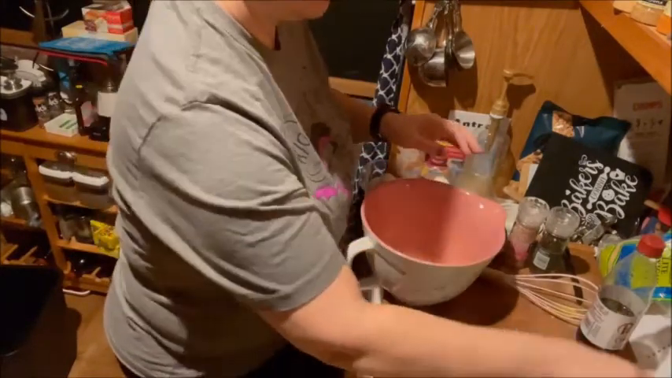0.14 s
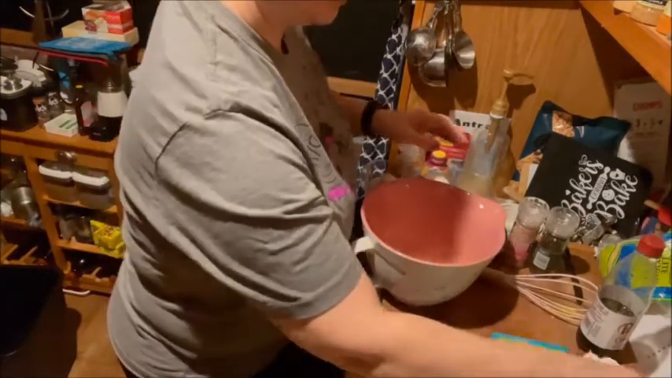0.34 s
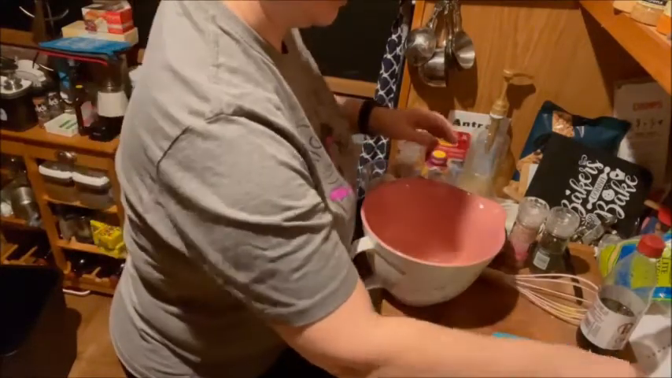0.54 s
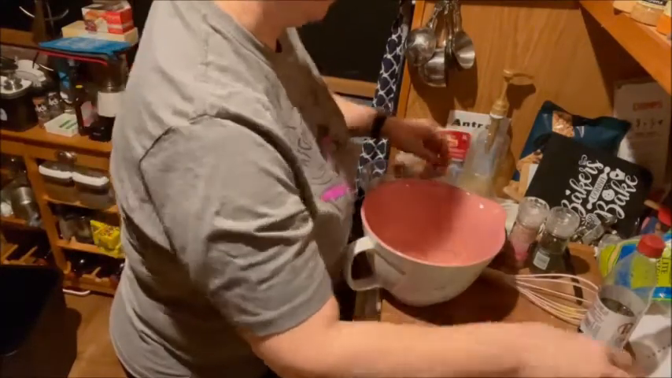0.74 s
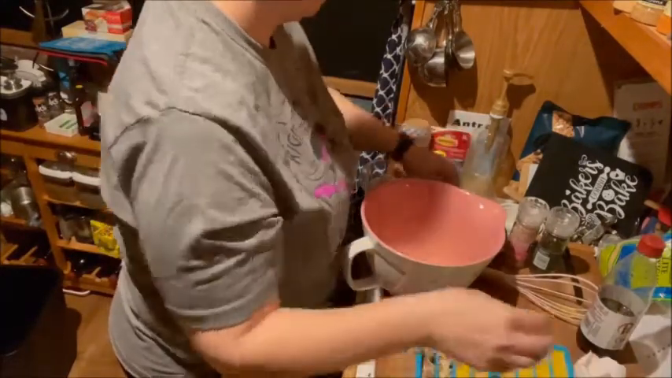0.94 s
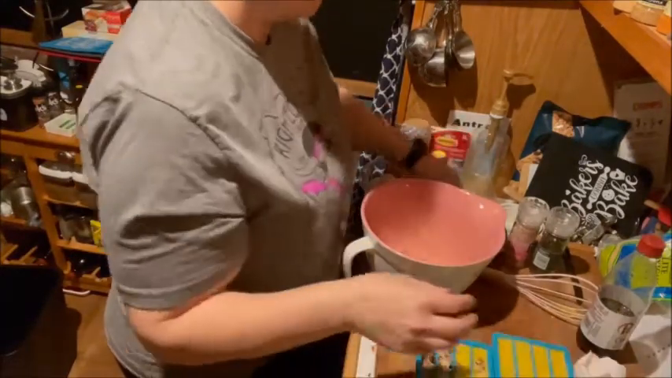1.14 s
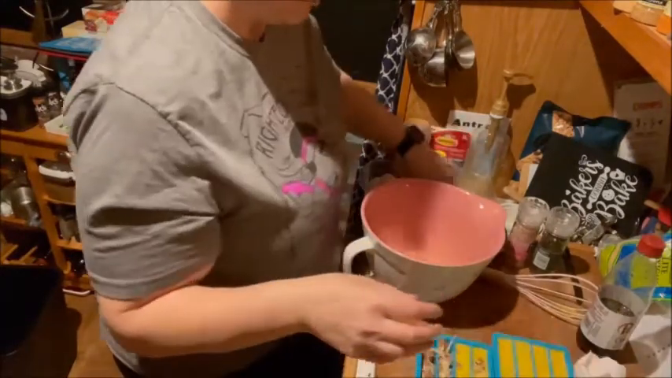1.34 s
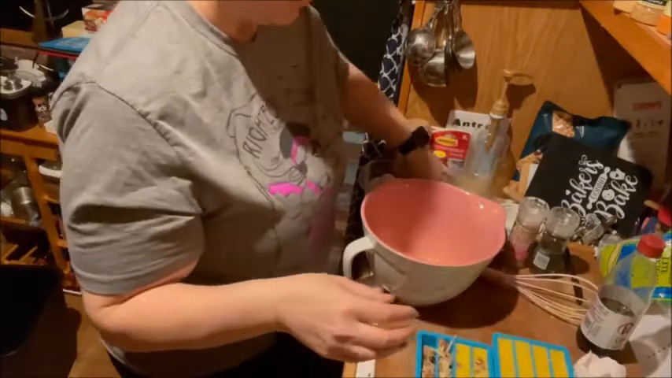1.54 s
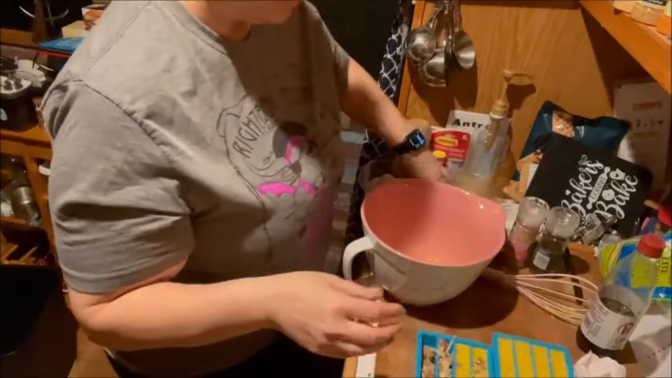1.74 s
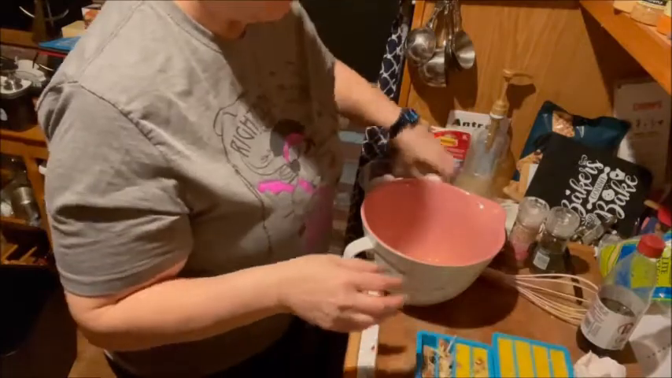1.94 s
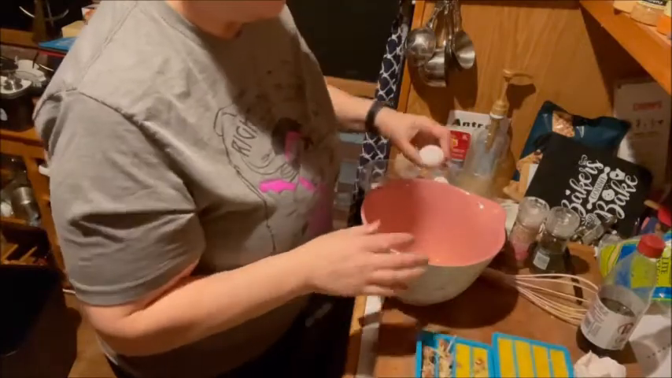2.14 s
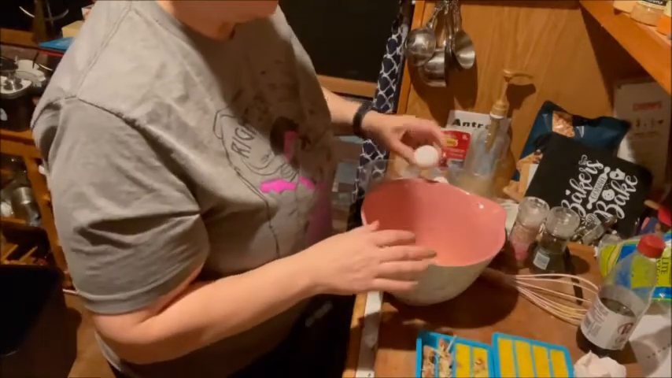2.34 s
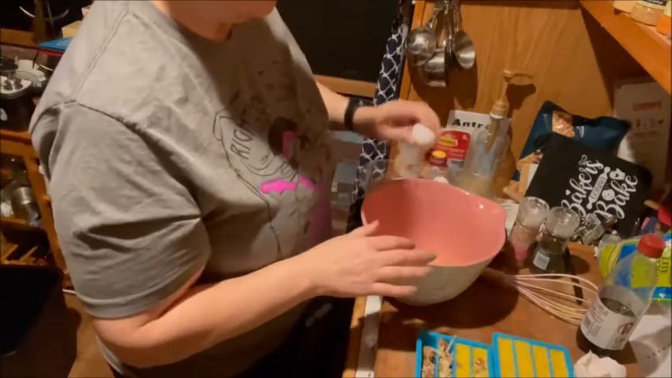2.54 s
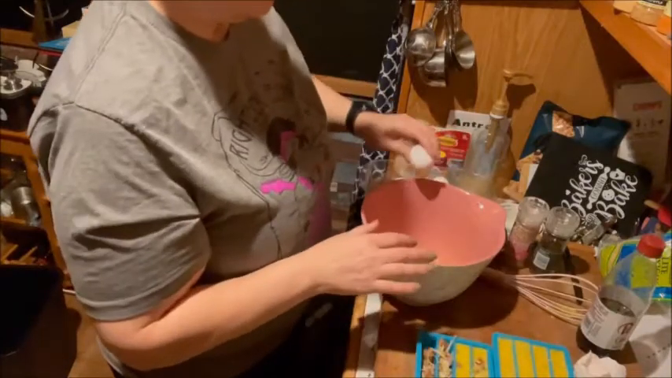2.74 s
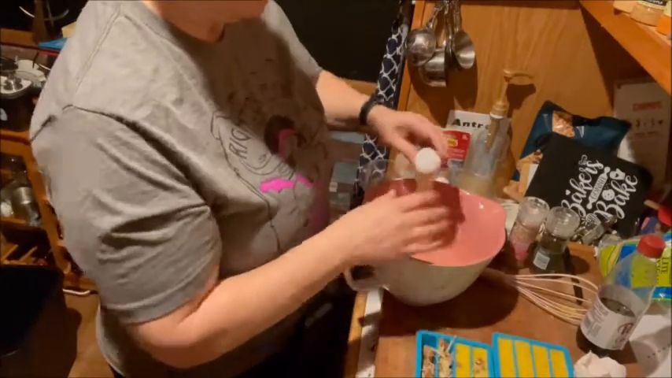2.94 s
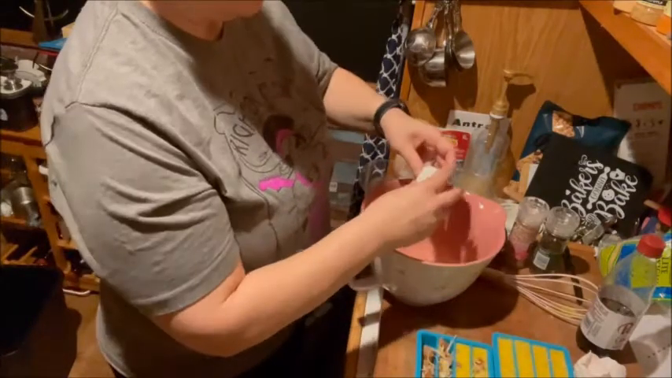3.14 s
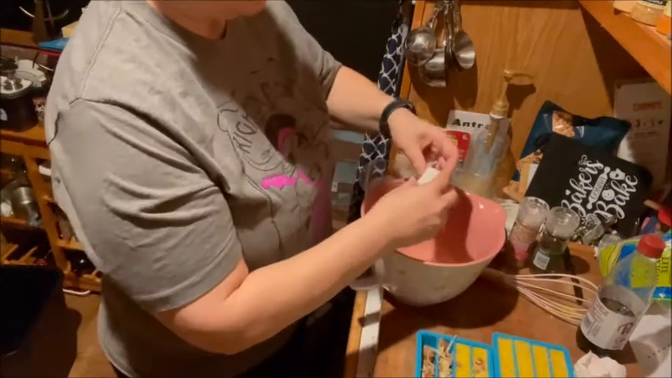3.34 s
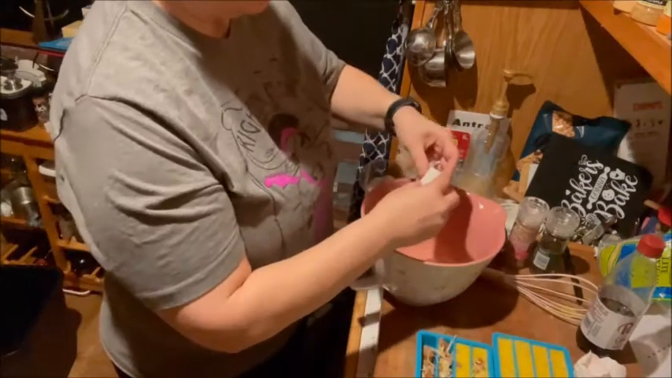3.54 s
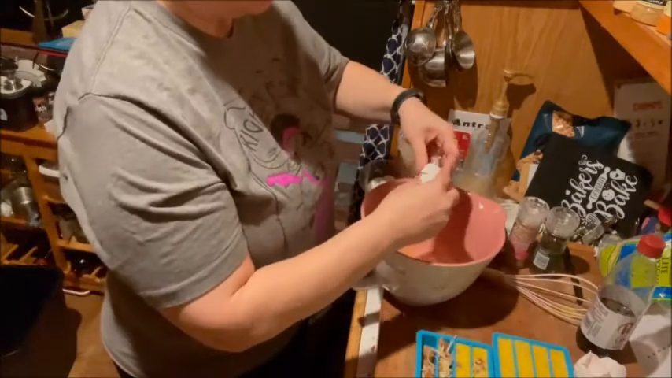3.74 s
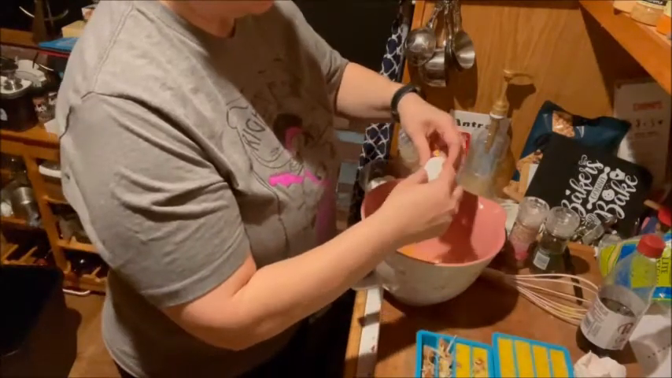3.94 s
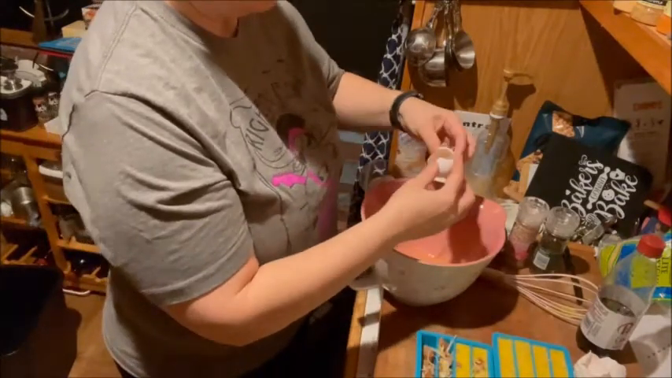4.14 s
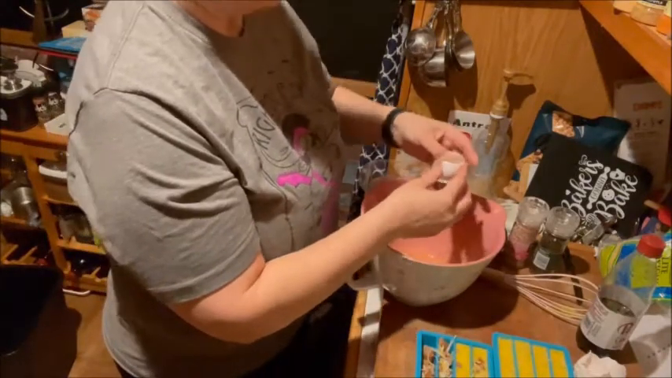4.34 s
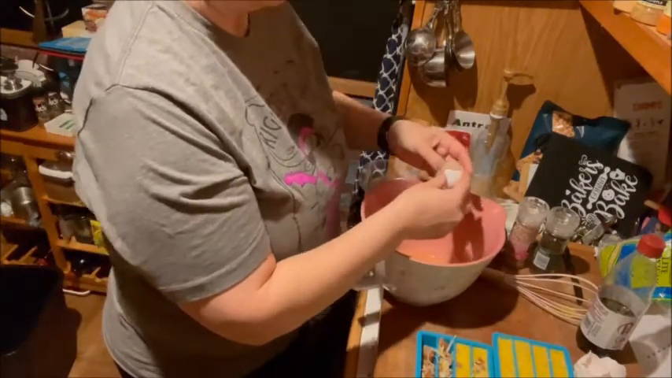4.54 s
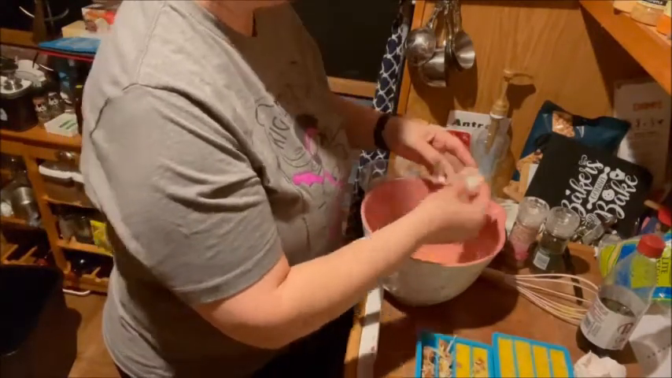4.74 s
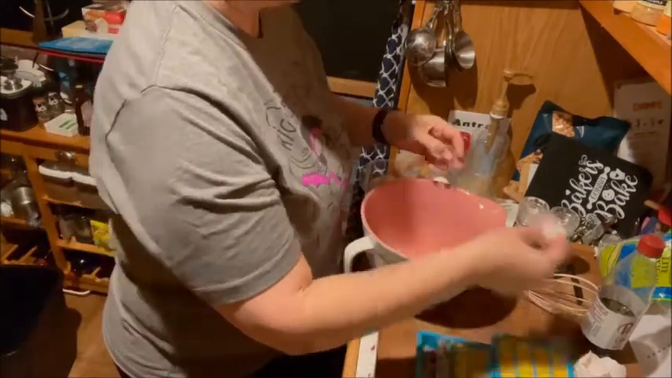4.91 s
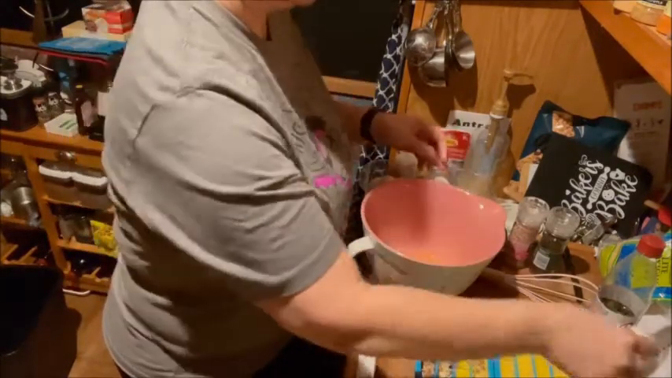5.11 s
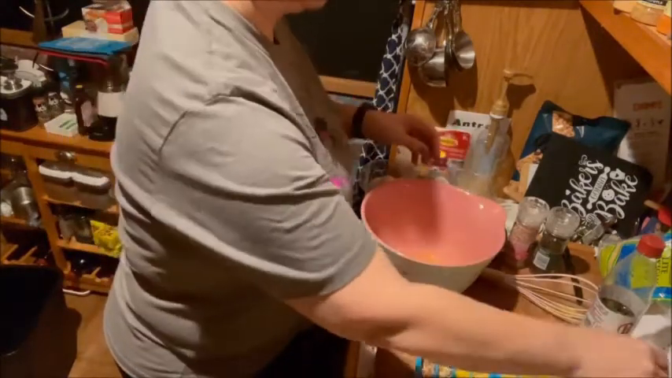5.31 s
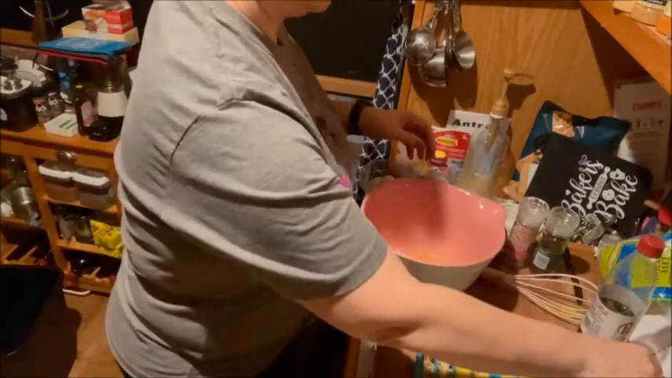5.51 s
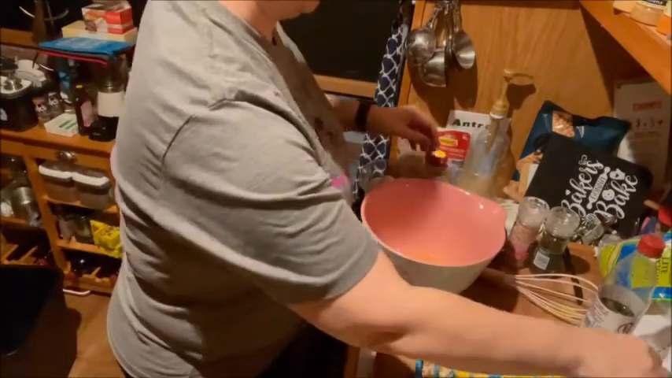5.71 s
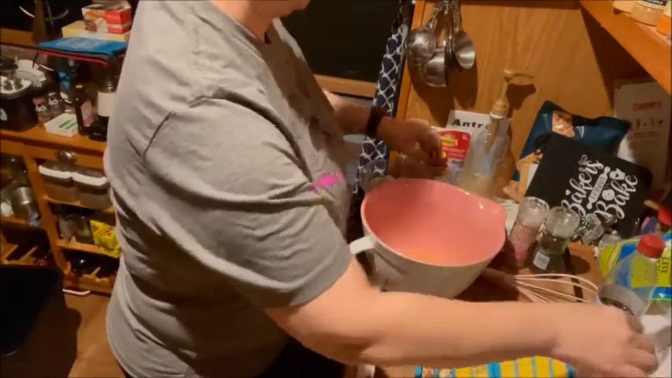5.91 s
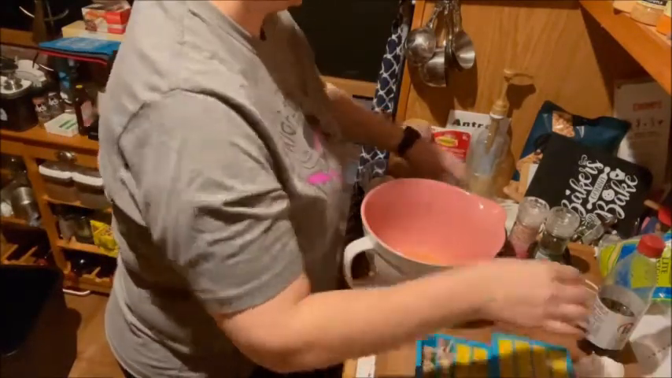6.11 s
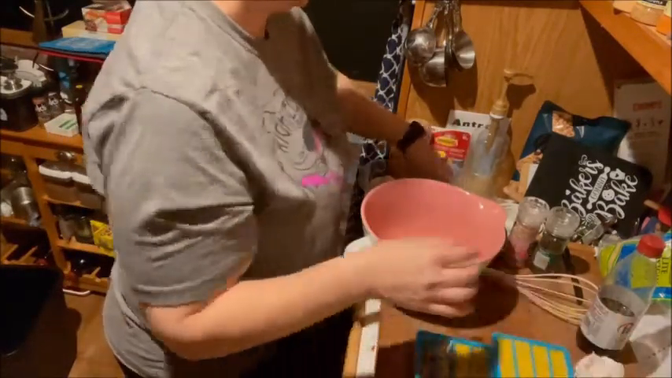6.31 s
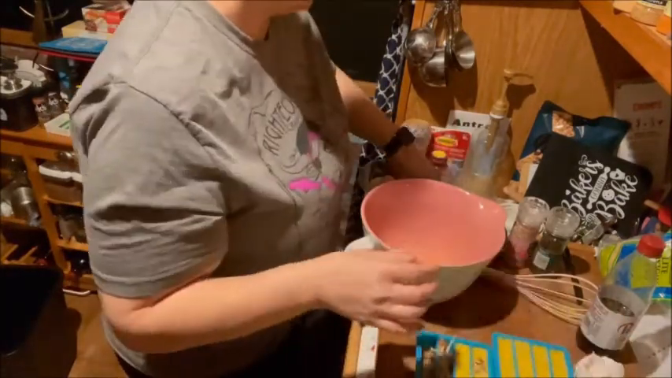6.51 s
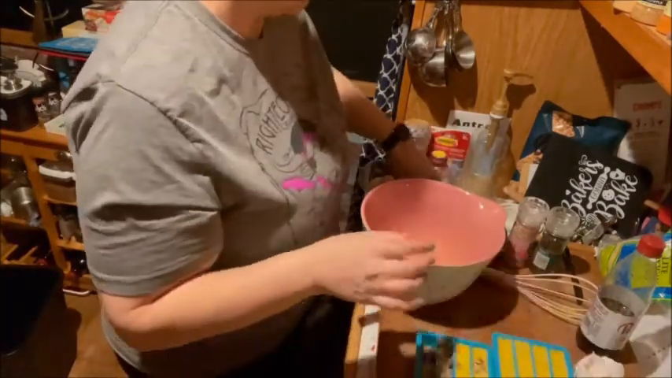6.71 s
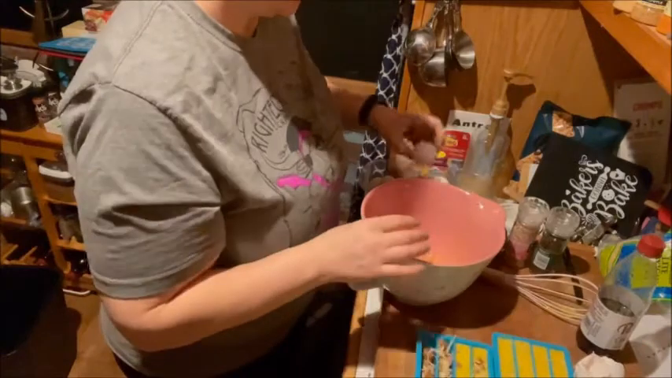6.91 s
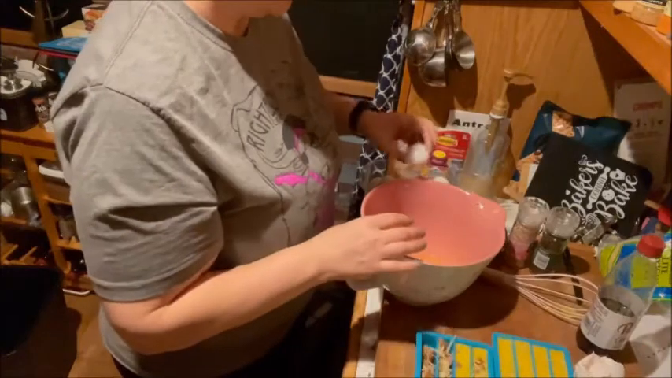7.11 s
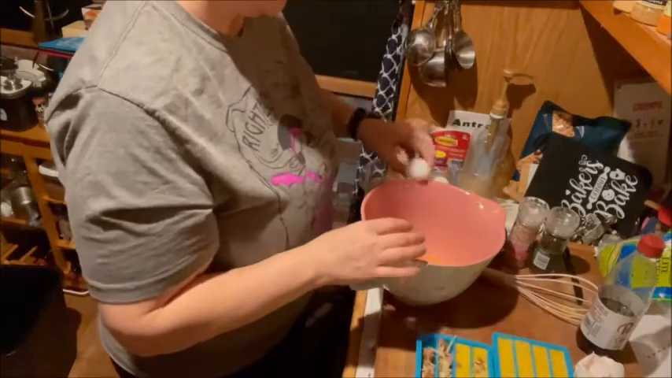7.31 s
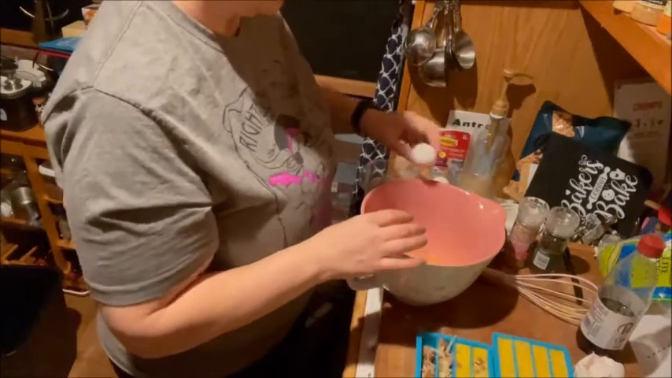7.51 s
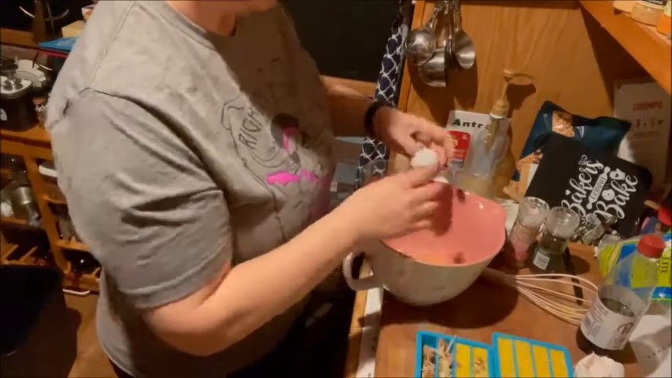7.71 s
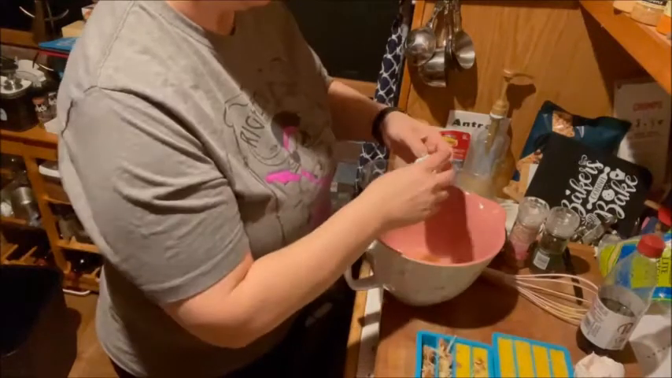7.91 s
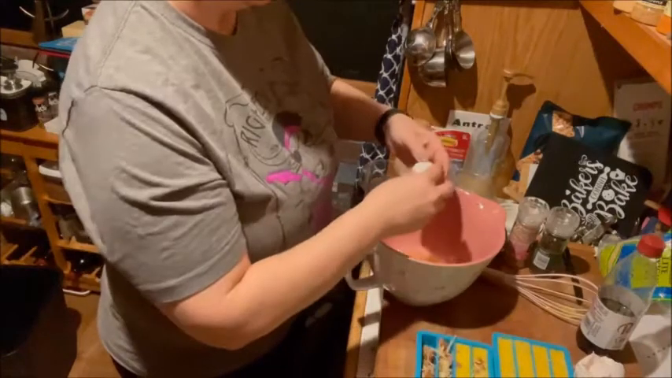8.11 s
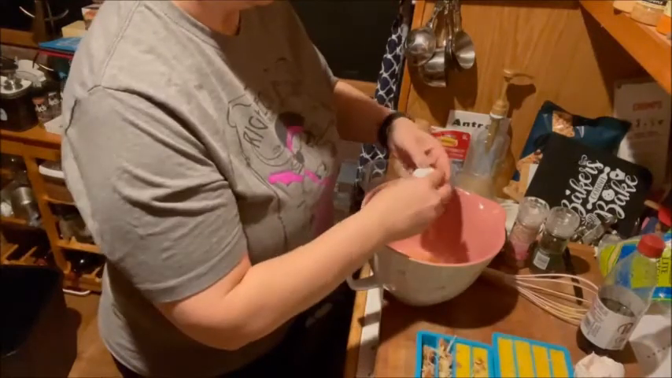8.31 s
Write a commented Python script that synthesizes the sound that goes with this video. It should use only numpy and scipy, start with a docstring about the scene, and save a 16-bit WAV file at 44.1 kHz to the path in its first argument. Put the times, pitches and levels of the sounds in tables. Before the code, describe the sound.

Empty eggshells scrape and clack lightly into a carton over low kitchen noise. An egg knocks about in its box, then is cracked sharply on a mixing bowl, whose rim rings briefly. The shell snaps and tears, and the egg drops in with a faint plop. More shells go into the carton, and a second egg is cracked and pried with a faint wet creak. Soft counter thuds come in between, all heard through the small room.

```python
"""Empty eggshells scrape and clack into a carton over the low noise of a small kitchen.
Counter and floor thud softly as the cook leans over. Two eggs in turn knock about in their box and are
cracked on the ringing rim of a mixing bowl. The first snaps, tears and drops in; the second creaks
wetly and snaps as it is pried. Blows are clicks with a run of tiny fractures, friction is a stream
of catches and slips, both heard through the room; the bowl is a sum of decaying modes."""
import sys
import numpy as np
from scipy import signal
from scipy.fft import rfft, irfft
from scipy.io import wavfile

SR = 44100
rng = np.random.default_rng(int(sys.argv[2]) if len(sys.argv) > 2 else 0)


def dump(signal):
    """Clip the signal to [-1, 1] and save it as 16-bit WAV at the path in sys.argv[1]."""
    limited = np.clip(np.atleast_2d(signal).T, -1, 1)
    pcm = np.round(limited * 32767).astype(np.int16)
    wavfile.write(sys.argv[1], SR, pcm)


N = 368676


def amp(db):
    """Decibels to gain."""
    return 10 ** (np.asarray(db) / 20)


def unit(x):
    """Scales to rms 1."""
    return x / np.sqrt(np.mean(x ** 2) + 1e-20)


def read(points, hz):
    """Interpolates a table over log frequency."""
    f, value = np.transpose(points)
    return np.interp(np.log(hz + 1), np.log(f + 1), value)


def add(mix, start_s, sound):
    """Mixes a sound in at start_s."""
    part = mix[:, max(round(start_s * SR), 0):][:, :sound.shape[1]]
    part += sound[:, :part.shape[1]]


def pulse(colour, tilt_db_oct=0, size=4096):
    """Minimum-phase click of a given colour, energy 1."""
    hz = abs(np.fft.fftfreq(size, 1 / SR))
    log_gain = np.log(amp(np.maximum(read(colour, hz), -100) + tilt_db_oct * np.log2(hz + 20)))
    spectrum = np.exp(np.conj(signal.hilbert(log_gain)))
    click = np.fft.ifft(spectrum).real[:size // 2]
    return click / np.linalg.norm(click)


# left-right correlation: f/Hz, coefficient
CORRELATION = [(50, 0.5), (250, 0.6), (500, 0.1), (1000, -.15), (2400, 0), (6000, -.1), (16000, -.2)]

def pair(x):
    """Makes two unrelated channels alike at long wavelengths."""
    left, other = rfft(x)
    same = np.clip(read(CORRELATION, np.fft.rfftfreq(x.shape[1], 1 / SR)), -1, 1)
    right = same * left + np.sqrt(1 - same ** 2) * other
    return irfft(np.array([left, right]), x.shape[1])


def noise(colour):
    """Steady coloured stereo noise, rms 1."""
    spectrum = rfft(rng.standard_normal((2, N))) * amp(read(colour, np.fft.rfftfreq(N, 1 / SR)))
    return unit(pair(irfft(spectrum, N)))


# kitchen reverberation: f/Hz, t60/s
KITCHEN_T60 = [(60, 0.077), (250, 0.37), (600, .28), (1500, 0.34), (4000, .31), (8000, .25), (16000, .18)]

def kitchen(direct_db, early_db=-1, early_s=0.012, echoes_per_s=1500, size=12288):
    """Path from one spot: direct sound, quick echoes off counter and cupboards, short tail."""
    t = np.arange(size) / SR
    hz, frame_s, diffuse = signal.stft(pair(rng.standard_normal((2, size))), SR, nperseg=256)
    decay = amp(-60 * frame_s / read(KITCHEN_T60, hz)[:, None])
    tail = signal.istft(diffuse * decay, SR)[1][:, :size]
    echoes = rng.choice([-1, 1], (2, size)) * (rng.random((2, size)) < echoes_per_s / SR)
    early = pair(echoes) * np.exp(-t / early_s)
    path = (unit(tail) + amp(early_db) * unit(early)) / np.sqrt(size)
    path[:, 0] += amp(direct_db)
    return path / np.sqrt(np.sum(path ** 2) / 2)


def envelope(length_s, attack_s, release_s, sag_db):
    """One gesture: swell, sag, release."""
    t = np.arange(0, length_s + 6 * release_s, 1 / SR)
    held = np.minimum(t / attack_s, 1) * amp(sag_db * np.minimum(t / length_s, 1))
    return held * np.exp(-np.maximum(t - length_s, 0) / release_s)


def strokes(rows, colour, gain_db, attack_s, release_s, sag_db, catches_per_s, spread_db):
    """Friction: dense runs of small catches and slips, heard through the room."""
    path = signal.fftconvolve(pulse(colour)[None], kitchen(direct_db=-5), axes=1)
    out = np.zeros((2, N))
    for start_s, length_s, db in rows:
        contact = amp(db + gain_db) * envelope(length_s, attack_s, release_s, sag_db)[:SR]
        sign, size, chance = rng.random((3, SR))[:, :len(contact)]
        size_db = spread_db * np.minimum(-np.log(size + 1e-9), 4)
        slips = np.sign(sign - .5) * amp(size_db) * (chance < catches_per_s / SR)
        add(out, start_s, signal.fftconvolve((unit(slips) * contact)[None], path, axes=1))
    return out


def force(crush_s, crumble_db, lead_s, lead_db, grains_per_s=2200, size=5000):
    """A scuff swelling into contact, one click, then a dying run of tiny fractures."""
    t = np.arange(size) / SR - lead_s
    grains = rng.standard_normal(size) * (rng.random(size) < grains_per_s / SR)
    scuff = amp(lead_db) * np.exp(-2 * abs(t) / lead_s)
    crush = np.exp(-abs(t) / max(crush_s, .001))
    push = amp(crumble_db) * unit(grains * np.where(t < 0, scuff, crush)) / np.sqrt(size)
    push[np.argmin(abs(t))] += 1
    return push


def blows(rows, colour, gain_db, direct_db, crumble_db, lead_s, lead_db, pan_db):
    """Impacts of one colour, each from its own spot in the room; positive pan is left."""
    out = np.zeros((2, N))
    for contact_s, db, crush_s, tilt_db_oct, *_ in rows:
        blow = signal.fftconvolve(force(crush_s, crumble_db, lead_s, lead_db), pulse(colour, tilt_db_oct))
        blow = signal.fftconvolve(blow[None], kitchen(direct_db), axes=1)
        blow *= np.sqrt(SR / 20) / np.linalg.norm(blow)  # equal energy before gain
        add(out, contact_s - lead_s, amp(db + gain_db) * blow)
    return out * amp(pan_db * np.array([[.5], [-.5]]))


def lasting(rows, crush_s):
    """Gives shell clicks a common crush time."""
    return [(s, db, crush_s, tilt) for s, db, tilt in rows]


# room noise and counter/floor spectra: f/Hz, level/dB
AIR_COLOUR = [(15, -40.5), (28, -17.5), (55, -9.5), (157, -9.5), (249, 0.5), (440, -12.5), (560, -7.5),
              (734, -13), (850, -20), (1160, -28), (1600, -31), (3100, -41), (10400, -44.5), (16000, -51)]
THUD_COLOUR = [(20, -26.5), (45, -7), (62, 0.5), (85, -2.5), (130, -10.5), (220, -17.5), (400, -34),
               (900, -68), (3000, -100)]
# cook's movement: t/s, level/dB
MOVEMENT = [(0, 0), (2.9, 3), (3.8, -16.5), (5.25, -14.5), (5.9, 1.5), (8.08, -2), (8.17, -12)]
# pushes and shifts of weight: t/s, length/s, level/dB
WEIGHT_SHIFTS = [(0, 0.069, -64), (0.572, 0.12, -54), (1.296, 0.16, -52.5), (1.898, .06, -57),
                 (2.575, 0.1, -43), (3.548, .03, -61), (5.92, 0.15, -54.5), (7.26, .05, -45.5),
                 (7.553, .23, -61), (7.955, 0.11, -59.5)]

def room_rumble(air_db=-64, air_share=0.25, stir_db=-68):
    """Room noise and a faint stir follow the cook's movement; counter and floor rumble under load."""
    moving_db = np.interp(np.arange(N) / SR, *np.transpose(MOVEMENT))
    rumble = amp(stir_db + moving_db)[None]
    for start_s, length_s, db in WEIGHT_SHIFTS:
        add(rumble, start_s, amp(db) * envelope(length_s, attack_s=.023, release_s=.035, sag_db=-2)[None])
    return amp(air_db + air_share * moving_db) * noise(AIR_COLOUR) + rumble * noise(THUD_COLOUR)


# shell strokes: t/s, length/s, rasp level/dB, fizz level/dB
SHELL_SLIDES = [(0.294, 0.095, -48.5, -63), (0.455, 0.048, -53, -72), (3.995, 0.019, -59, -76),
                (4.153, 0.09, -57, -68), (5.356, .04, -47, -54.5), (5.5, 0.056, -54.5, -55),
                (5.554, 0.12, -46.5, -55.5), (5.684, .17, -58.5, -65.5), (5.929, 0.094, -57, -78),
                (6.003, 0.11, -45.5, -66), (6.119, .06, -53.5, -85)]
# rasp and fizz spectra: f/Hz, level/dB
RASP_COLOUR = [(600, -33), (1100, -15.5), (1500, -2.5), (1900, 2), (2500, -5), (3200, -17), (5000, -25.5),
               (9000, -35)]
FIZZ_COLOUR = [(1500, -21), (3800, -20), (6300, -1), (8000, -8.5), (10500, -0.5), (13000, -22),
               (15500, -9.5)]

def sliding_shell():
    """Shell rubs on shell and carton: a hollow rasp and a fine fizz."""
    slides = np.array(SHELL_SLIDES)
    rasp = strokes(slides[:, [0, 1, 2]], RASP_COLOUR, gain_db=-2.5,
                   attack_s=.0054, release_s=.012, sag_db=-2.5, catches_per_s=800, spread_db=5)
    fizz = strokes(slides[:, [0, 1, 3]], FIZZ_COLOUR, gain_db=-.5,
                   attack_s=.0088, release_s=.015, sag_db=-3, catches_per_s=463, spread_db=5)
    return rasp + fizz


# half-shell contacts: t/s, level/dB, tilt/(dB/oct)
HALF_CLACKS = [(.2974, -42, -0.8), (.4009, -44, -2), (.4574, -39, 0), (.4745, -38.5, -11), (.5014, -46, 4),
               (.5151, -51, -6), (.6325, -51, -5), (3.994, -48, 1), (4.1803, -51.5, 6), (4.4826, -57, -1),
               (5.3553, -34, -6.5), (5.364, -34, -5.5), (5.4001, -38.5, 1), (5.4431, -49, -8),
               (5.767, -49, -1.5), (5.81, -54, -0.5), (5.852, -52.5, -2), (6.006, -48.5, 2),
               (6.02, -41, -5), (6.0791, -38.5, -5.5), (6.1105, -49, -8.5)]
# half-shell spectrum: f/Hz, level/dB
HALF_COLOUR = [(470, -67), (800, -29.5), (930, -30.5), (1230, -18), (1350, -12), (1760, -2), (2130, -6),
               (3650, -22.5), (4860, -22.5), (6090, -13), (8030, -28), (10400, -18), (12900, -37),
               (14700, -26), (16000, -27.5)]

def half_shells():
    """Hollow halves touch each other and the carton."""
    return blows(lasting(HALF_CLACKS, crush_s=.0039), HALF_COLOUR, gain_db=-7, direct_db=-5.5,
                 crumble_db=0, lead_s=.0052, lead_db=1, pan_db=1)


# counter and floor blows: t/s, level/dB, push/s, tilt/(dB/oct)
COUNTER_THUDS = [(0.588, -55, 0.0076, 1), (0.641, -52, 0.014, -17.5), (1.33, -44, 0.0078, 3.5),
                 (1.478, -35, 0.0091, 1), (2.43, -50.5, 0.012, -5), (2.569, -43, 0.012, -1.7),
                 (5.921, -43.5, 0.0077, -0.5), (6.077, -41.5, 0.0078, -11.5), (7.258, -35.5, 0.012, -1.5),
                 (7.528, -35, 0.01, -5), (7.583, -37.5, 0.008, -11), (8.059, -47, 0.0096, -1)]

def counter_thuds():
    """Counter and floor answer soft pushes with low thuds."""
    return blows(COUNTER_THUDS, THUD_COLOUR, gain_db=-6.5, direct_db=-4,
                 crumble_db=-1.5, lead_s=.01, lead_db=-6.5, pan_db=-1)


# whole-shell contacts: t/s, level/dB, tilt/(dB/oct)
SHELL_CLINKS = [(.857, -49.5, 3), (3.8765, -58, -8)]
# whole-shell spectrum: f/Hz, level/dB
CLINK_COLOUR = [(1500, -43), (2500, -11), (2850, -2), (3150, -14), (3600, -7.5), (3880, 0.5), (4250, -21),
                (8000, -39), (16000, -35)]

def shell_clinks():
    """A light touch excites two narrow resonances of a whole shell."""
    return blows(lasting(SHELL_CLINKS, crush_s=.0017), CLINK_COLOUR, gain_db=-7, direct_db=-3,
                 crumble_db=-8, lead_s=.0013, lead_db=13, pan_db=-.5)


# egg-on-box contacts: t/s, level/dB, rub/s, tilt/(dB/oct)
BOX_KNOCKS = [(1.014, -49, 0.0042, 9.5), (1.026, -36.5, 0.0024, -5.5), (1.296, -35.5, 0.0054, -5),
              (1.335, -26, 0.0042, -0.6), (1.353, -23, 0.0068, 0.24), (1.636, -30.5, 0.015, -0.5),
              (1.664, -30, 0.0044, -0.3), (1.797, -30, 0.0017, 1), (1.812, -26.5, 0.0079, 0),
              (1.897, -16.5, 0.0015, 1), (1.923, -14, 0.0037, 0.6), (1.954, -31.5, 0.002, 0.5),
              (6.425, -38.5, 0.0063, -7.5), (6.476, -36, 0.0023, -2), (6.496, -34.5, 0.0033, -1.5),
              (6.554, -45, 0.0037, -6.5)]
# box spectrum: f/Hz, level/dB
BOX_COLOUR = [(90, -32.5), (170, -15.5), (310, -13), (400, -4), (466, 0.5), (550, -8), (670, -3),
              (1000, -15.5), (1400, -16.5), (2200, -22), (3500, -33), (6200, -41.5), (10000, -51.5),
              (16000, -68.5)]

def box_knocks():
    """Eggs knock about in their box as one is picked up."""
    return blows(BOX_KNOCKS, BOX_COLOUR, gain_db=-7.5, direct_db=-7.5,
                 crumble_db=5.5, lead_s=.006, lead_db=-10.5, pan_db=-.5)


# small fractures: t/s, level/dB, tilt/(dB/oct)
SHELL_SNAPS = [(1.0161, -59, -13), (1.2126, -53, -9), (1.263, -49, -12), (3.065, -46.5, -1.5),
               (3.1098, -50.5, -4.2), (3.339, -56, -1), (3.3702, -51, -1.5), (3.471, -44.5, -3),
               (3.4972, -29, -3), (3.6656, -52, 12.5), (3.7452, -59, -7), (3.8946, -54.5, -3.5),
               (4.0966, -52.5, -5.5), (4.162, -42, -2), (4.2337, -51.5, -2.5), (7.4959, -54.5, -3.5),
               (8.1645, -64, -3.5), (8.1994, -47, 3.5), (8.2313, -53.5, 0), (8.326, -61.5, 3.5),
               (8.3514, -54.5, -1.8)]
# snap spectrum: f/Hz, level/dB
SNAP_COLOUR = [(350, -52.5), (600, -23), (869, -12.5), (1210, -10), (1350, -11), (1550, -13.5), (3160, -5),
               (3390, -2.5), (3630, -4), (4400, -2), (10000, -1), (16000, -17.5)]

def shell_snaps():
    """Shell clicks and snaps under the fingers."""
    return blows(lasting(SHELL_SNAPS, crush_s=.0031), SNAP_COLOUR, gain_db=-11.5, direct_db=-3.5,
                 crumble_db=6.5, lead_s=.0022, lead_db=-9, pan_db=-.5)


# finger strokes: t/s, length/s, level/dB
FINGER_STROKES = [(1.02, 0.018, -53), (1.098, 0.022, -58), (1.27, 0.063, -62), (1.32, 0.082, -49.5),
                  (1.622, .025, -52), (1.775, 0.038, -54.5), (1.885, .05, -39.5), (6.42, .09, -64)]
# brushing spectrum: f/Hz, level/dB
BRUSH_COLOUR = [(150, -5), (450, -6.5), (900, -8), (1800, -10), (4000, -26), (6800, -18), (11000, -48),
                (16000, -36)]

def fingers():
    """Fingers brush the box, feeling among the eggs."""
    return strokes(FINGER_STROKES, BRUSH_COLOUR, gain_db=.5,
                   attack_s=.0059, release_s=.0084, sag_db=-4, catches_per_s=800, spread_db=7)


# egg on rim: t/s, level/dB, crush/s, tilt/(dB/oct), ring level/dB, ring tilt/(dB/oct)
RIM_TAPS = [(2.5591, -11, 0.013, 0.5, 0.5, 0.5), (7.254, -16, 0.004, 1, -5.5, -1.5)]
# crack spectrum, shell peak near 6 kHz: f/Hz, level/dB
CRACK_COLOUR = [(100, -16), (300, -20), (450, -9.5), (580, -6.5), (950, -17.5), (1280, -7), (1520, -7.5),
                (2000, -23), (2520, -14.5), (3400, -20.5), (5200, -19.5), (6250, -13), (8000, -20.5),
                (16000, -31.5)]

def egg_cracks():
    """Shell is crushed against the rim."""
    return blows(RIM_TAPS, CRACK_COLOUR, gain_db=-13, direct_db=-14,
                 crumble_db=5.5, lead_s=.004, lead_db=-23, pan_db=-1.5)


# bowl modes, the lowest in beating pairs: f/Hz, level/dB, t60/s
BOWL_MODES = [(561, -28, .55), (542, -31, .53), (1501, -41, .98), (1516, -38.5, 1.05), (1509, -30, .13),
              (2520, -33, .69), (2529, -32, .16), (2760, -35, .28), (3063, -47, .32), (3761, -44, .34),
              (4341, -52, .36), (4397, -42, .3), (5074, -45, .28), (6115, -48, .26), (6244, -45, .24),
              (6525, -47, .27), (7365, -45, .2)]

def bowl_ring(rise_s=.004, pan_db=-2):
    """The rim rings after each tap, every mode slightly out of phase between left and right."""
    out, t = np.zeros((2, N)), np.arange(2 * SR) / SR
    for tap_s, *_, ring_db, tilt_db_oct in RIM_TAPS:
        for hz, db, t60_s in BOWL_MODES:
            phase = rng.uniform(-.5, .5, (2, 1))
            mode_db = db + ring_db + tilt_db_oct * np.log2(hz / BOWL_MODES[0][0])  # softer tap, duller ring
            mode = amp(mode_db - 60 * t / t60_s) * np.sin(2 * np.pi * hz * t + phase)
            add(out, tap_s, mode * (1 - np.exp(-t / rise_s)))
    return out * amp(pan_db * np.array([[.5], [-.5]]))


# pulls on the shell: t/s, length/s, level/dB
SHELL_TEARS = [(3.468, 0.032, -53.5), (3.5, 0.043, -52), (4.19, 0.12, -69.5)]
# tearing spectrum, shell cavity near 1 kHz: f/Hz, level/dB
TEAR_COLOUR = [(500, -22), (850, -2), (1150, 4), (1500, -9), (3200, -9.5), (7000, -18), (16000, -16)]

def tearing_shell():
    """Shell and membrane tear as the first egg's halves part."""
    return strokes(SHELL_TEARS, TEAR_COLOUR, gain_db=.5,
                   attack_s=.013, release_s=.012, sag_db=-2.5, catches_per_s=900, spread_db=3)


# egg landing: t/s, level/dB, splash/s, tilt/(dB/oct)
EGG_PLOPS = [(4.285, -52.5, 0.0069, 3), (4.296, -52.5, 0.02, -2), (4.378, -63, 0.016, -1)]
# splash spectrum: f/Hz, level/dB
PLOP_COLOUR = [(150, -11), (350, -4), (900, -2), (1500, 2), (3000, 0), (5000, -8.5), (9000, -13.5),
               (16000, -29)]

def egg_plops():
    """The first egg drops from its shell into the bowl."""
    return blows(EGG_PLOPS, PLOP_COLOUR, gain_db=-2, direct_db=-15,
                 crumble_db=3, lead_s=.004, lead_db=1, pan_db=-.5)


# reaches: t/s, length/s, level/dB
ARM_SWISHES = [(4.53, .17, -82.5), (6.28, .18, -84), (6.46, 0.32, -81.5), (6.8, 0.26, -91)]
# swish spectrum: f/Hz, level/dB
SWISH_COLOUR = [(1500, -27), (2600, -11), (3800, -12), (4700, -6), (5600, -5), (6600, -0.5), (8500, -15.5),
                (11000, -13), (14000, -28)]

def arm_swishes():
    """An arm reaches past with a faint swish."""
    return strokes(ARM_SWISHES, SWISH_COLOUR, gain_db=3,
                   attack_s=.037, release_s=.03, sag_db=-6.5, catches_per_s=6000, spread_db=3)


# prying strokes: t/s, length/s, level/dB
PRY_STROKES = [(7.612, 0.017, -58), (7.66, 0.043, -66), (7.86, .1, -81.5)]
# wet creak spectrum: f/Hz, level/dB
CREAK_COLOUR = [(1200, -9), (1650, -5), (1850, 3), (2150, -18), (2700, -22), (3400, -11.5), (4400, -29),
                (8000, -40)]

def wet_creak():
    """The second egg, cracked, creaks as it is pried at."""
    return strokes(PRY_STROKES, CREAK_COLOUR, gain_db=.5,
                   attack_s=.006, release_s=.012, sag_db=-5.5, catches_per_s=800, spread_db=5.5)


def scene():
    """Sums the sources in order of entry."""
    around_bowl = room_rumble() + sliding_shell() + half_shells() + counter_thuds()
    handling = shell_clinks() + box_knocks() + shell_snaps() + fingers()
    opening = egg_cracks() + bowl_ring() + tearing_shell() + egg_plops() + arm_swishes() + wet_creak()
    return around_bowl + handling + opening


def record(dry, cutoff_hz=16000):
    """Band limit: linear-phase low-pass."""
    low_pass = signal.firwin(401, cutoff_hz, window=("kaiser", 9), fs=SR)
    return signal.oaconvolve(dry, low_pass[None], "same", axes=1)


dry = scene()
out = record(dry)
dump(out)
```